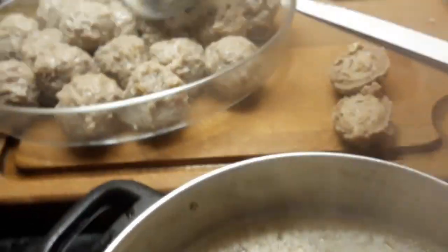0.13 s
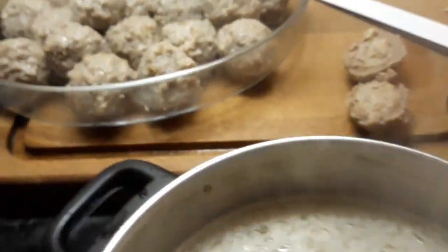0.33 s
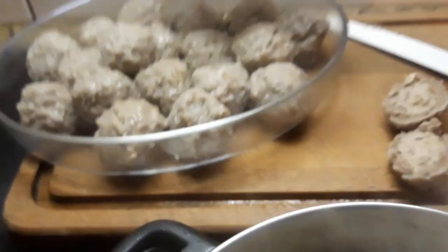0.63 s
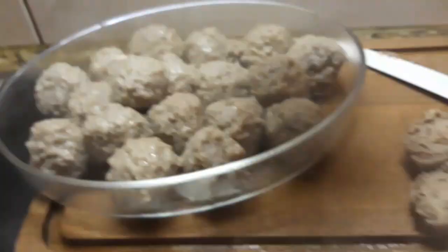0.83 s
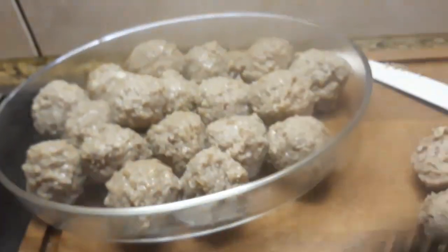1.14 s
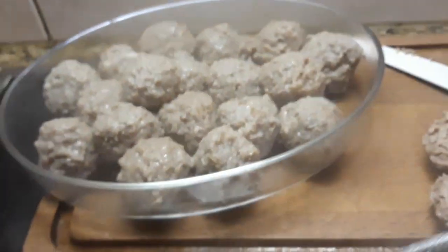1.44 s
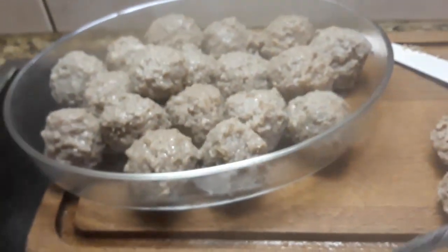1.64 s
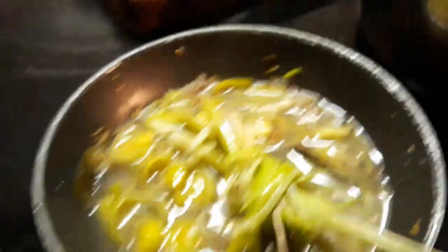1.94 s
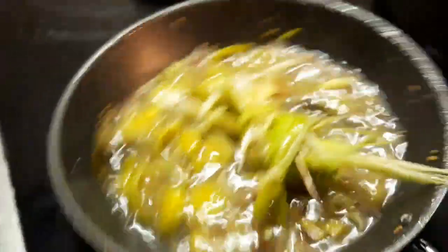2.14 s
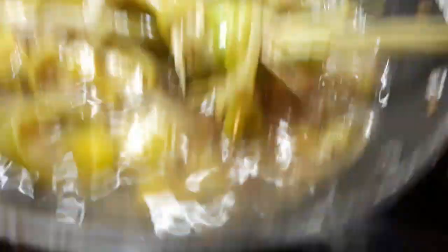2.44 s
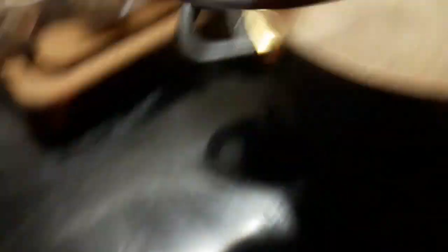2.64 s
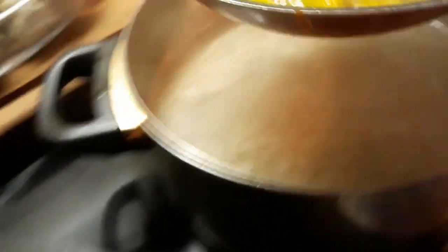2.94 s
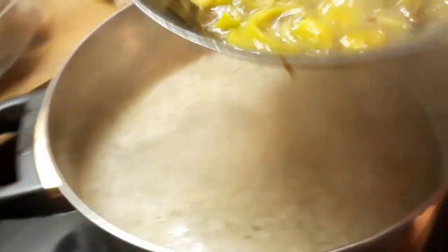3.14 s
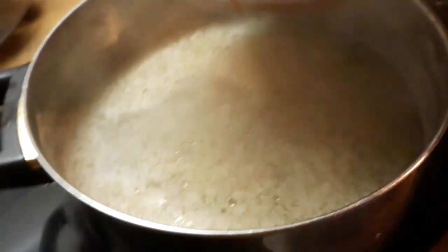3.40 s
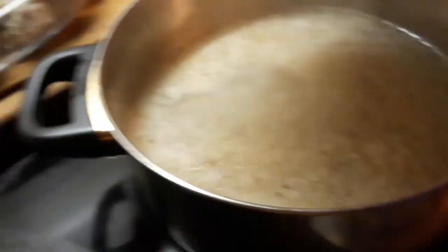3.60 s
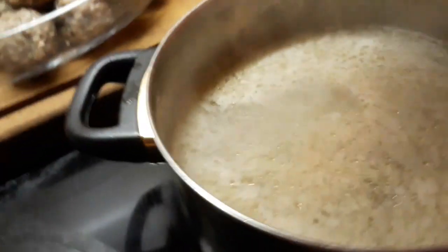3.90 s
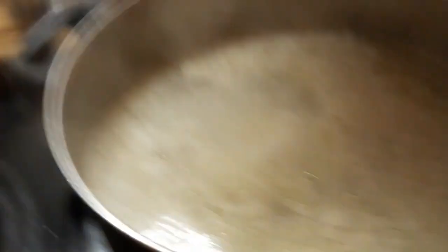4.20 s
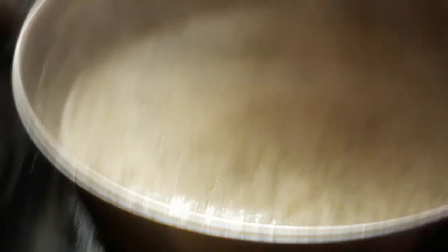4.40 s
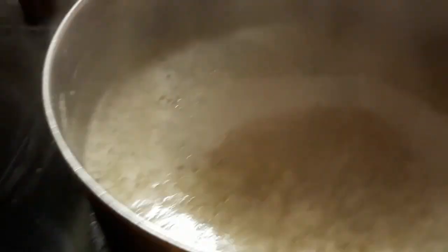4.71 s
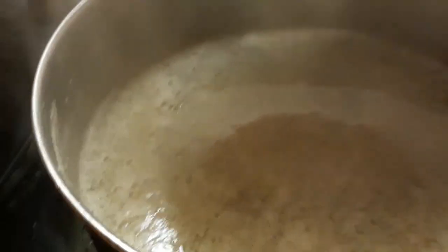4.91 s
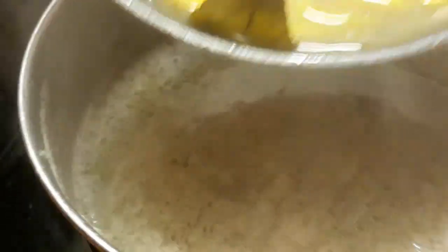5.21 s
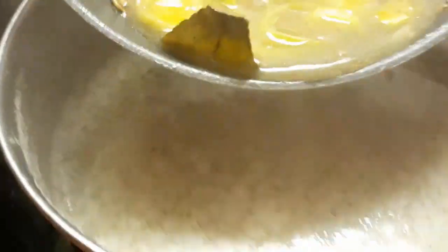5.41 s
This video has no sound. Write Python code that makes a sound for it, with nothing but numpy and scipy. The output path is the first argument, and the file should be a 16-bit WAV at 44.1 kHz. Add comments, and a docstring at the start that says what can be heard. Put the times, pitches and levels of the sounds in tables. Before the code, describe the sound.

Close metallic bang and scrape, quickening lid clinks, a pan thud and dull dish knocks, with quiet simmering behind.

```python
"""Pot and lid in a home kitchen

Close to a small microphone a metal pot is set down twice and dragged; its sound breaks off in a very short silence.
A metal lid rocks to rest with ever quicker clinks, a pan thuds, dishes knock dully and slide, and a hand
bumps the microphone, over faint simmering, room noise and mains hum. Struck things are noise cracks with decaying
sine modes, rubbed things are shaped noise under swelling strokes, and the simmer is noise with rising bubbles.
"""
import sys
import numpy as np
from scipy import signal
from scipy.io import wavfile
from scipy.ndimage import uniform_filter1d

SR = 44100
rng = np.random.default_rng(int(sys.argv[2]) if len(sys.argv) > 2 else 0)


def to_linear_factor(level_db):
    """Convert decibel levels (scalar or array-like) to linear amplitude factors."""
    exponent = np.asarray(level_db, float) / 20
    return 10 ** exponent


def store_wav(level_fs):
    """Save 16-bit WAV to argv[1]."""
    pcm = np.round(np.clip(np.atleast_2d(level_fs), -1, 1) * 32767)
    wavfile.write(sys.argv[1], SR, pcm.T.astype(np.int16))


N = 244755

# Colours give the spectrum's shape: their levels are relative, as are those of all modes and rings.
# room and simmer, with the pot's noisy tail swelling before the short silence:
# (time [s], murmur level [dB], hiss level [dB])
BACKGROUND_LEVELS = [(0, -51, -61.5), (.3, -66, -72), (.65, -65, -70.5), (.97, -69, -71.5), (1.4, -66, -69),
                     (1.86, -54.5, -41.5), (1.9, -59.5, -68.5), (2.25, -59, -59), (2.86, -54, -61.5),
                     (3.3, -55.5, -64), (3.76, -54.5, -63.5), (4.05, -54, -65.5), (4.7, -50.5, -59.5),
                     (4.9, -54, -67), (5.55, -53.5, -69.5)]
# colour of the low murmur: (frequency [Hz], level [dB])
MURMUR_COLOUR = [(18, -42), (30, -12), (69, -36.5), (98, 0.5), (177, -6), (379, 2), (431, -1), (579, -6.5),
                 (809, -7.5), (1090, -15), (1380, -29), (1760, -27.5), (2500, -31), (3250, -50),
                 (5500, -120)]
# colour of the hiss: (frequency [Hz], level [dB])
HISS_COLOUR = [(710, -29.5), (1200, 1.5), (1870, -1.5), (2550, -1.5), (2800, -4.5), (3100, -4.5),
               (3500, -2), (4080, 0.5), (5070, -3), (8170, -3.5), (9610, -11.5), (15200, -1.5), (16000, -5)]
HUM_HZ, HUM_DB = 49.4, -66
BUBBLES_PER_S, BUBBLE_DB = 14, -15.5  # level against the murmur
# the top of the hiss follows the hiss level only in part, around TOP_DB
TOP_HZ, TOP_DB, TOP_FOLLOWS = 9000, -70.5, 0.25
# narrow bands humming in the simmer: (start [s], end [s], centre [Hz], width [Hz], level [dB])
HUMMING_BANDS = [(0.27, 0.79, 418, 70, -68.5), (0.3, 1.57, 117, 55, -68.5), (2.299, 4.752, 281.7, 31, -58),
                 (2.7, 3.84, 403, 43, -60), (2.8, 4.402, 136, 8.2, -67.5), (3.699, 4.3, 2380, 230, -78),
                 (4.699, 5.65, 1380, 160, -68), (4.8, 5.65, 2440, 110, -82.5)]
# thin dry ticks: (time [s], level [dB], centre [Hz])
TICK_EVENTS = [(.106, -60, 7600), (0.197, -53.5, 7000), (1.1, -60.5, 7940), (2.128, -64, 11500),
               (2.845, -63, 12000), (2.965, -65, 11000), (3.187, -62, 14000), (3.483, -48, 8100),
               (3.52, -61, 13500), (3.853, -65, 11100), (4.66, -58, 9800)]

# faint rustling: (start [s], peak [s], end [s], level [dB], brightness [dB per octave])
RUSTLE_STROKES = [(0.0, 0.003, 0.17, -53.5, 0.5), (0.196, 0.2, 0.28, -59, 3.5),
                  (0.2, 0.245, 0.38, -53.5, -1.5), (1.07, 1.1, 1.17, -65, 7.5),
                  (1.21, 1.29, 1.36, -67, 1.5)]
# colour of the rustling: (frequency [Hz], level [dB])
RUSTLE_SPECTRUM = [(500, -5), (850, -30), (1010, 5), (1260, -7), (1750, -3.5), (2800, -15), (4700, -12.5),
                   (8500, -25), (9800, -40), (16000, -28)]
# the hand on the microphone: (start [s], peak [s], end [s], level [dB])
HANDLING_STROKES = [(0.0, 0.003, 0.07, -40.5), (0.04, 0.088, 0.2, -39.5), (2.835, 2.85, 2.89, -44.5),
                    (2.88, 2.915, 2.98, -53), (2.98, 3.016, 3.06, -47.5), (5.055, 5.078, 5.13, -45)]
# colour of the handling: (frequency [Hz], level [dB])
HANDLING_SPECTRUM = [(18, -40), (30, -26), (81, 7), (129, -0.5), (225, -35), (331, -3.5), (500, -13),
                     (650, -90), (1100, -120)]
# fingers knocking the microphone's housing: (time [s], level [dB])
HOUSING_KNOCKS = [(2.839, -37.5), (2.894, -41), (2.911, -36.5), (2.918, -44), (2.932, -40), (2.988, -43),
                  (5.073, -50)]
# colour of the housing: (frequency [Hz], level [dB])
HOUSING_COLOUR = [(30, -25), (70, 2), (130, 2), (190, 4), (300, -22), (600, -42), (1200, -66)]

# the pan lifted off the hob: (time [s], level [dB], treble tilt [dB per octave], ring level [dB])
PAN_THUDS = [(2.022, -38, -9.5, -1.5), (2.0345, -26, 5, -6.5)]
# modes of the pan: (frequency [Hz], level [dB], decay by 60 dB [s])
PAN_MODES = [(143, -25, 0.099), (213, -4.5, 0.1), (356, -1, 0.13), (470, -22, 0.087), (670, -5, 0.14),
             (1030, -10, 0.12)]
# colour of the pan's crack: (frequency [Hz], level [dB])
PAN_CRACK_COLOUR = [(60, -27), (150, 1.5), (382, 6), (543, -10.5), (1060, -10), (1560, -43), (2470, -42),
                    (5000, -56), (11000, -71)]
# room tail after the pan: (frequency [Hz], decay by 60 dB [s])
PAN_TAIL_DECAY = [(100, 0.089), (400, 0.65), (1200, 0.54), (4000, 0.73)]
# dull knocks of dishes: (time [s], level [dB], treble tilt [dB per octave], ring level [dB])
DISH_KNOCKS = [(3.667, -39, -14.5, -4), (4.059, -49, 3, -9), (4.075, -40.5, -3, -1),
               (4.1165, -30.5, -1, 9.5), (4.2375, -15.5, -2.5, -2), (4.2465, -25.5, 4, -8),
               (4.2615, -25.5, 3, -3), (4.274, -27, 6, 8), (4.287, -28, -2.5, 11), (4.31, -33.5, 5, 12)]
# modes of the dishes: (frequency [Hz], level [dB], decay by 60 dB [s])
DISH_MODES = [(283, -8, 0.34), (400, -17, 0.13), (455, 1, 0.063), (500, -5, 0.014), (548, 0.5, 0.084),
              (770, -20, 0.054), (1012, -2, 0.034), (1300, -7, 0.091), (1500, -20, 0.085),
              (1786, -7, 0.064), (2390, -24, .06), (3260, -37, 0.074)]
# colour of the dishes' crack: (frequency [Hz], level [dB])
DISH_CRACK_COLOUR = [(59, -66), (100, -42), (156, -28), (295, 5), (373, 1.5), (583, 10.5), (752, -1),
                     (1450, -5), (1900, -11), (2320, -19), (3400, -27), (4200, -54), (8460, -46),
                     (10200, -58), (16000, -52.5)]
# room tail after the dishes: (frequency [Hz], decay by 60 dB [s])
DISH_TAIL_DECAY = [(150, 0.52), (500, 0.29), (1500, 0.39), (4000, 0.15), (12000, 0.12)]
# dishes sliding: (start [s], peak [s], end [s], level [dB], brightness [dB per octave])
SLIDE_STROKES = [(3.54, 3.65, 3.78, -57.5, -1.5), (3.76, 3.85, 3.97, -62.5, 9),
                 (4.05, 4.12, 4.22, -59, 6.5), (4.24, 4.28, 4.45, -49.5, 0.5), (4.335, 4.37, 4.52, -51, 6),
                 (4.36, 4.6, 4.74, -44, 3)]
# colour of the sliding: (frequency [Hz], level [dB])
SLIDE_SPECTRUM = [(180, -36), (300, -12), (645, 1), (994, 4), (1750, -1.5), (2500, -2.5), (2850, -5.5),
                  (3700, -3.5), (8220, -12.5), (9880, -25.5), (16000, -19.5)]

# the lid touches down, then rocks from near edge to far edge: (time [s], level [dB], what lands [name])
LID_CLINKS = [(1.4227, -21.5, "flat"), (1.8721, -26.5, "near"), (2.068, -33.5, "near"),
              (2.2396, -28.5, "near"), (2.3935, -33, "near"), (2.4076, -30.5, "near"),
              (2.5382, -27.5, "near"), (2.664, -32.5, "far"), (2.787, -27, "near"), (2.8913, -35, "far"),
              (3.003, -30.5, "near"), (3.0917, -35.5, "far"), (3.1882, -33.5, "near"),
              (3.261, -38.5, "far"), (3.36, -37, "near"), (3.419, -39, "far"), (3.508, -38, "near"),
              (3.648, -40, "near"), (3.7077, -45, "far"), (3.778, -46, "near")]
# each landing, by name: (treble tilt [dB per octave], ring level [dB], time constant of the soft start [s])
LID_LANDINGS = {"flat": (0.52, -9, 0.00067), "near": (0.08, -5, 0.0071), "far": (-2.8, -5, 0.0061)}
# modes of the lid: (frequency [Hz], level [dB], decay by 60 dB [s])
LID_MODES = [(2524, -7, 0.072), (3354, -6.5, 0.068), (3620, -4, 0.081), (4400, -23, 0.089),
             (4900, 2.5, 0.047), (5816, -8.5, 0.14), (6830, -5, 0.063), (7070, 6.5, 0.053),
             (7110, -11, 0.25), (7190, -8.5, 0.22), (7360, -28, 0.1), (8600, -13, 0.28), (8700, -14, 0.092),
             (8540, -5, 0.04), (11920, -17, 0.068)]
# colour of the lid's crack: (frequency [Hz], level [dB])
LID_CRACK_COLOUR = [(410, -12.5), (700, -0.5), (1440, -2.5), (2550, -3.5), (3000, -7), (3460, 1.5),
                    (3990, -5), (4730, 4), (5400, -4), (7290, 0.5), (8880, -1), (9480, -25), (12200, -5),
                    (16000, -48.5)]
# room tail after the lid: (frequency [Hz], decay by 60 dB [s])
LID_TAIL_DECAY = [(1000, 0.46), (4000, 0.36), (9000, 0.2), (15000, 0.071)]
# the lid's rim scraping: (start [s], peak [s], end [s], level [dB], brightness [dB per octave])
SCRAPE_STROKES = [(1.44, 1.47, 1.61, -51, -1.5), (1.55, 1.615, 1.75, -43.5, 0),
                  (2.066, 2.08, 2.17, -52, -0.5), (2.105, 2.162, 2.198, -46.5, 0.5)]
# colour of the scraping: (frequency [Hz], level [dB])
SCRAPE_SPECTRUM = [(290, -38.5), (500, -22), (1340, -1.5), (2190, -3), (2810, -4.5), (3980, -3.5),
                   (6230, -9), (7420, -1.5), (10100, -16), (12900, -11.5), (16000, -14)]
# resonances of the scraped rim: (frequency [Hz], width [Hz], level [dB])
SCRAPE_RESONANCES = [(876, 50, 6), (1385, 55, -7), (3270, 170, -2), (4400, 266, 1.5), (5540, 180, 2),
                     (8000, 330, 1.5), (12970, 900, -3.5)]

# the pot dragged: (start [s], peak [s], end [s], level [dB], brightness [dB per octave])
DRAG_STROKES = [(1.67, 1.79, 1.84, -35, 0.5), (1.77, 1.845, 1.868, -30.5, 1)]
# colour of the drag: (frequency [Hz], level [dB])
DRAG_SPECTRUM = [(290, -67.5), (500, -25), (893, 2), (1060, -13), (1340, 2), (1530, -18), (1720, 0.5),
                 (2570, -10.5), (3340, -8), (8210, -17.5), (16000, -25)]
# resonances of the dragged pot: (frequency at the start of a stroke [Hz], width [Hz], level [dB])
DRAG_RESONANCES = [(876, 52, -3), (1150, 31, -1), (1347, 53, 0.5), (1700, 50, -6), (2190, 88, -5.5),
                   (2760, 90, 0), (3280, 100, 4), (3720, 42, 5), (4050, 80, 1.5), (5250, 70, 4),
                   (7550, 60, 4), (8380, 98, 0)]
# modes of the worktop: (frequency [Hz], level [dB], decay by 60 dB [s])
WORKTOP_MODES = [(72.2, -8, 0.14), (113.3, -4.5, 0.35), (143.7, -0.5, 0.47), (148, -9.5, 0.15),
                 (219.3, -5.5, 0.22)]
BOOM_LAG_S = 0.01063  # shifts the phases of the worktop's modes
# the pot set down on its edge, then flat:
# (time [s], level [dB], treble tilt [dB per octave], ring level [dB], worktop boom level [dB])
POT_LANDINGS = [(1.4249, -18.5, 5, 0, -28.5), (1.648, -0.5, 2, -3.5, -20)]
# modes of the pot: (frequency [Hz], level [dB], decay by 60 dB [s])
POT_MODES = [(372, -12, 0.52), (388, -12.5, 0.39), (614, -10, 0.1), (811, -12.5, .25), (820, -4.5, 0.15),
             (873, -7.5, 0.19), (987, -24.5, 0.4), (1365, -16.5, 0.22), (1536, -15, 0.22),
             (1660, -18, 0.16), (2394, -15.5, 0.1516), (2664, -13.5, 0.075), (3395, -11.5, .13),
             (3960, -28, 0.3), (5200, -25.5, 0.0805), (5460, -29, 0.2), (8210, -24, 0.078)]
# colour of the pot's crack: (frequency [Hz], level [dB])
POT_CRACK_COLOUR = [(120, -30), (200, -14.5), (265, -26), (380, 8), (700, -2.5), (1000, 3.5), (1500, -9.5),
                    (2560, -7.5), (3130, -10), (3840, -12.5), (5250, -15.5), (8030, -16.5), (10400, -38),
                    (15300, -33.5), (16500, -63)]
# room tail after the pot: (frequency [Hz], decay by 60 dB [s])
POT_TAIL_DECAY = [(80, 0.168), (300, 0.52), (1000, 0.58), (3000, 0.51), (8000, 0.26), (15000, 0.11)]
# the short silence: start [s], end [s]
SILENCE_S = (1.8675, 1.8735)

HARD_DB = -33  # around this level a blow keeps its top treble unchanged
MIC_LOW_HZ, MIC_TOP_HZ = 45, 15850


def evened(x):
    """Scales to an rms of 1."""
    return x / np.sqrt(np.mean(x ** 2) + 1e-20)


def read(points, hz):
    """Reads a table on a log-frequency axis."""
    f, value = np.transpose(points)
    return np.interp(np.log(hz + 1), np.log(f + 1), value)


def add(mix, s, sound):
    """Adds a sound at a time in seconds."""
    part = mix[round(s * SR):][:len(sound)]
    part += sound[:len(part)]


def noise(count, field_db, size=256):
    """Random short-time spectra shaped by a dB field over frequency (rows) and time (columns)."""
    frames = 4 * count // size + 5
    hz = np.fft.rfftfreq(size, 1 / SR)[:, None]
    t = np.arange(frames) * size / 4 / SR
    real, imaginary = rng.standard_normal((frames, len(hz), 2)).T
    spectra = (real + 1j * imaginary) * to_linear_factor(field_db(hz, t))
    return signal.istft(spectra, nperseg=size, noverlap=3 * size // 4)[1][:count]


def lumps(hz, at, bins, frames):
    """Random patches over frequency and time, rms 1, smoothed over some bins and frames."""
    grains = rng.standard_normal((len(at), len(hz))).T
    return evened(uniform_filter1d(uniform_filter1d(grains, bins, 0), frames, 1))


def octaves(hz, from_hz=2000):
    """Octaves above a frequency, levelling off in the top treble."""
    return np.log2((np.minimum(hz, 9000) + 50) / from_hz)


def impact(colour_db, count=1024):
    """The minimum-phase pulse of a colour: it starts at once and is as short as it can be, peak 1."""
    hz = np.abs(np.fft.fftfreq(4 * count, 1 / SR))
    log_gain = np.log(to_linear_factor(colour_db(hz)).clip(1e-5))
    pulse = np.fft.ifft(np.exp(np.conj(signal.hilbert(log_gain)))).real[:count]
    return pulse / np.abs(pulse).max()


def blows(rows, modes, crack, tail, ring_db, crack_t60, tail_db, treble_from_hz, soft_s, spot_db, swell_s,
          tick_db, impact_db, chatter_s, chatter_db, hold_s=0, waver_db=0, air_per_db=0):
    """Each blow is an impact, a tick, a crack, wavering modes, four rebounds and a tail dying band by band."""
    out, t = np.zeros(N), np.arange(SR // 2) / SR
    hz, db, t60 = np.transpose(modes)
    for s, level_db, treble_db, own_ring_db, *_ in rows:
        # with air_per_db set, softer blows lose top treble
        air_db = air_per_db * min(level_db - HARD_DB + rng.standard_normal(), 1)

        def tilt(f):
            return treble_db * octaves(f, treble_from_hz) + (f > 9500) * air_db

        def colour_db(f):
            return read(crack, f) + tilt(f)
        snap = noise(len(t), lambda f, at: colour_db(f), size=1024)
        decay = noise(len(t), lambda f, at: colour_db(f) - 60 * at / read(tail, f), size=512)

        where_db = spot_db * rng.standard_normal(len(hz))  # each spot struck favours other modes
        detune = 1 + 0.002 * rng.standard_normal(len(hz))  # the contact shifts each mode a little
        decay_db = db + tilt(hz) + where_db - 60 * t[:, None] / t60
        rings = to_linear_factor(decay_db) * np.sin(2 * np.pi * hz * detune * t[:, None])
        waver = evened(uniform_filter1d(rng.standard_normal((len(t) // 64 + 1, len(hz))), 9, 0))
        waver = uniform_filter1d(np.repeat(waver, 64, 0), 64, 0)[:len(t)]
        rings = (rings * to_linear_factor(waver_db * waver)).sum(1)
        rings *= 1 - np.exp(-t / swell_s)  # the ring builds up while the contact lasts
        rings *= to_linear_factor(ring_db + own_ring_db)

        soft = 1 - np.exp(-t / soft_s)
        crack_shape = to_linear_factor(-60 * (t - hold_s).clip(0) / crack_t60)
        tick_shape = to_linear_factor(tick_db - 60 * t / 0.0095)
        burst = snap * (crack_shape + tick_shape) / snap.std() / 3
        room_tail = to_linear_factor(tail_db) * decay / snap.std() / 3
        sound = (burst + room_tail + rings) * soft
        rebound = (burst + rings) * soft
        for late in rng.random(size=4):
            add(out, s + late * chatter_s, to_linear_factor(level_db + chatter_db - 8 * late) * rebound)
        add(sound, 0, to_linear_factor(impact_db) * impact(colour_db))
        add(out, s, to_linear_factor(level_db) * sound)
    return out


def rubbed(strokes, colour, rise_db, fall_db, bend, grit_db, patchy_db, rings=(), ring_db=0., glide=0.,
           slip_db=0., size=256):
    """Friction noise swells and dies with each stroke: gritty, patchy, ringing the body it rubs."""
    out = np.zeros(N)
    for start, peak, end, level_db, *bright in strokes:
        t = np.arange(start, end, 1 / SR)
        before = (peak - t).clip(0) / max(peak - start, 1 / SR)
        after = (t - peak).clip(0) / max(end - peak, 1 / SR)
        stroke_db = level_db - rise_db * before ** bend - fall_db * after ** bend

        def field_db(hz, at):
            peaks = 0
            for centre_hz, width, db in rings:
                moved_hz = centre_hz * (1 + glide * at / (end - start))
                peaks = peaks + to_linear_factor(ring_db + db) / np.sqrt(1 + (2 * (hz - moved_hz) / width) ** 2)
            body_db = 20 * np.log10(1 + peaks)
            return read(colour, hz) + sum(bright) * octaves(hz) + body_db + patchy_db * lumps(hz, at, 3, 12)
        grit = to_linear_factor(grit_db * evened(uniform_filter1d(rng.standard_normal(len(t)), 150)))
        slips = np.repeat(rng.exponential(size=len(t) // 24 + 1), 24)  # short slips of 24 samples
        grit = grit * to_linear_factor(slip_db * uniform_filter1d(slips, 12)[:len(t)].clip(0, 4))
        sound = evened(noise(len(t), field_db, size=size) * grit)
        sound = sound * signal.windows.tukey(len(t), 200 / len(t))
        add(out, start, sound * to_linear_factor(stroke_db))
    return out


def simmer():
    """A patchy low murmur with bubbles rising in pitch, a hiss that also carries the pot's noisy tail, and hum."""
    s, murmur_db, hiss_db = np.transpose(BACKGROUND_LEVELS)
    t, u = np.arange(N) / SR, np.arange(2200) / SR
    murmur = evened(noise(N, lambda hz, at: read(MURMUR_COLOUR, hz) + 2.5 * lumps(hz, at, 4, 6), size=2048))

    bubbles, kinds = np.zeros(N), np.geomspace(260, 900, 20)
    for hz in kinds:
        starts = rng.random(N) < BUBBLES_PER_S / len(kinds) / SR
        pops = starts * to_linear_factor(7.5 * rng.exponential(1, N).clip(0, 3))
        chirp = np.sin(2 * np.pi * hz * u * (1 + 5.4 * u))
        pop = chirp * np.exp(-u * hz / 3.7) * (1 - np.exp(-u * hz / 1.9))
        bubbles += signal.oaconvolve(pops, pop * to_linear_factor(read(MURMUR_COLOUR, hz)))[:N]
    low = (murmur + to_linear_factor(BUBBLE_DB) * evened(bubbles)) * to_linear_factor(np.interp(t, s, murmur_db))

    hiss = evened(noise(N, lambda hz, at: read(HISS_COLOUR, hz), size=1024))
    level_db = np.interp(t, s, hiss_db)
    top = signal.oaconvolve(hiss, signal.firwin(201, TOP_HZ, pass_zero=False, fs=SR), "same")
    top_level_db = TOP_DB + TOP_FOLLOWS * (level_db - TOP_DB)
    hiss = (hiss - top) * to_linear_factor(level_db) + top * to_linear_factor(top_level_db)
    return low + hiss + to_linear_factor(HUM_DB) * np.sin(2 * np.pi * HUM_HZ * t)


def humming():
    """Noise in narrow resonances of pot and water that swells and fades."""
    out = np.zeros(N)
    for start, end, centre_hz, width, level_db in HUMMING_BANDS:
        count = round((end - start) * SR)
        band = noise(count, lambda hz, at: -20 * np.log10(1 + (2 * (hz - centre_hz) / width) ** 2), size=4096)
        add(out, start, to_linear_factor(level_db) * evened(band) * signal.windows.tukey(count, 0.4))
    return out


def ticks():
    """Each tick is a short burst of treble noise, falling away within milliseconds."""
    out, t = np.zeros(N), np.arange(1024) / SR
    for s, level_db, centre_hz in TICK_EVENTS:
        burst = noise(len(t), lambda hz, at: -20 * np.log10(1 + ((hz - centre_hz) / 760) ** 2))
        add(out, s, to_linear_factor(level_db - 60 * t / 0.038) * evened(burst))
    return out


def rustles():
    """Faint rustling, made as friction noise without resonances."""
    return rubbed(RUSTLE_STROKES, RUSTLE_SPECTRUM, rise_db=13.0, fall_db=22.5, bend=1.58,
                  grit_db=-0.5, patchy_db=1.5)


def handling():
    """The hand moves on the microphone: low friction noise."""
    return rubbed(HANDLING_STROKES, HANDLING_SPECTRUM, rise_db=12.0, fall_db=20.5, bend=0.5,
                  grit_db=-1.0, patchy_db=2.5, size=1024)


def bumps():
    """Each finger knock on the housing is one low pulse."""
    out, pulse = np.zeros(N), impact(lambda hz: read(HOUSING_COLOUR, hz), count=2048)
    for s, level_db in HOUSING_KNOCKS:
        add(out, s, -to_linear_factor(level_db) * pulse)
    return out


def pan():
    """The pan leaves the hob with a low thud: a crack and a few low modes."""
    return blows(PAN_THUDS, PAN_MODES, PAN_CRACK_COLOUR, PAN_TAIL_DECAY, ring_db=-11.5, crack_t60=0.087,
                 tail_db=-1.5, treble_from_hz=690, soft_s=0.00055, spot_db=-2.0, swell_s=0.0026, tick_db=1.0,
                 impact_db=-1.0, chatter_s=0.0127, chatter_db=-5.5)


def dishes():
    """Dishes knock dully: soft contacts and mostly fast-dying modes."""
    return blows(DISH_KNOCKS, DISH_MODES, DISH_CRACK_COLOUR, DISH_TAIL_DECAY, ring_db=-23.0, crack_t60=0.041,
                 tail_db=1.0, treble_from_hz=730, soft_s=0.003, spot_db=3.0, swell_s=0.0044, tick_db=-20.0,
                 impact_db=1.0, chatter_s=0.03, chatter_db=-25.0, waver_db=6.5)


def slides():
    """Dishes slide: friction noise without resonances."""
    return rubbed(SLIDE_STROKES, SLIDE_SPECTRUM, rise_db=10.0, fall_db=23.5, bend=1.44,
                  grit_db=0.2, patchy_db=1.0)


def lid():
    """The lid clinks as it rocks; each kind of landing has its own colour, ring and softness."""
    out = np.zeros(N)
    for part, (treble_db, ring_db, soft_s) in LID_LANDINGS.items():
        rows = [(s, db, treble_db, ring_db) for s, db, lands in LID_CLINKS if lands == part]
        out += blows(rows, LID_MODES, LID_CRACK_COLOUR, LID_TAIL_DECAY, ring_db=-11.5, crack_t60=0.025,
                     tail_db=-9.0, treble_from_hz=5300, soft_s=soft_s, spot_db=3.0, swell_s=0.0013,
                     tick_db=-7.5, impact_db=-29.0, chatter_s=0.018, chatter_db=-6.0, hold_s=0.0034,
                     waver_db=3.5, air_per_db=1.5)
    return out


def scrape():
    """The lid's rim scrapes: friction noise through broad resonances."""
    return rubbed(SCRAPE_STROKES, SCRAPE_SPECTRUM, rise_db=21.5, fall_db=27.5, bend=2.6, grit_db=2.1,
                  patchy_db=1.0, rings=SCRAPE_RESONANCES, ring_db=12.5, size=512)


def drag():
    """The dragged pot slips in short steps and rings in narrow resonances that glide up."""
    return rubbed(DRAG_STROKES, DRAG_SPECTRUM, rise_db=14.5, fall_db=8.0, bend=0.61, grit_db=1.2,
                  patchy_db=3.0, rings=DRAG_RESONANCES, ring_db=13.0, glide=0.04, slip_db=2.0, size=1024)


def worktop():
    """The worktop booms under the pot; its low modes beat, and their level wavers slowly at random."""
    out, t = np.zeros(N), np.arange(SR // 2) / SR
    boom = np.zeros(len(t))
    for hz, db, t60 in WORKTOP_MODES:
        boom += to_linear_factor(db - 60 * t / t60) * np.sin(2 * np.pi * hz * (t - BOOM_LAG_S))
    boom *= 1 - np.exp(-t / 0.00041)
    for s, *_, boom_db in POT_LANDINGS:
        waver_db = 3.5 * evened(uniform_filter1d(rng.standard_normal(len(t)), 900))
        waver_db *= np.minimum(t / 0.071, 1)  # wavering sets in gradually
        add(out, s, to_linear_factor(boom_db + waver_db) * boom)
    return out


def pot():
    """The pot is set down: a hard, bright crack sets off its metal modes."""
    return blows(POT_LANDINGS, POT_MODES, POT_CRACK_COLOUR, POT_TAIL_DECAY, ring_db=-15.0, crack_t60=0.054,
                 tail_db=-15.0, treble_from_hz=1400, soft_s=0.00077, spot_db=-4.0, swell_s=0.00012,
                 tick_db=0.5, impact_db=-1.5, chatter_s=0.022, chatter_db=-31.0, waver_db=4.0)


def scene():
    """Sums the kitchen; all falls silent for a moment, and the pot and worktop do not ring on after it."""
    t = np.arange(N) / SR
    silence_from, silence_to = SILENCE_S
    room = simmer() + ticks()
    pot_ring = pot()
    knocks = dishes() + pan()
    friction = drag() + scrape() + slides() + rustles()
    microphone = handling() + bumps()
    set_down = (pot_ring + worktop()) * (t < silence_to)
    mix = room + knocks + friction + microphone + set_down + lid() + humming()
    away = np.maximum(silence_from - t, t - silence_to)  # seconds from the short silence
    return (mix * np.clip(away / 0.0002, 0, 1))[None]


def top_cut(x):
    """Nothing passes above the cut-off."""
    return signal.sosfilt(signal.butter(12, 16840, fs=SR, output="sos"), x)


def record(dry):
    """The microphone drops the deep bass and most of the top treble, and rounds the loudest peaks."""
    bass_filter = signal.butter(3, MIC_LOW_HZ, "high", fs=SR, output="sos")
    low_cut = signal.sosfilt(bass_filter, dry)
    dull = signal.oaconvolve(low_cut, signal.firwin(301, MIC_TOP_HZ, fs=SR)[None], "same")
    picked_up = dull + to_linear_factor(-25.5) * (low_cut - dull)
    rounded = 0.95 * np.tanh(picked_up / 0.95)
    return top_cut(rounded)


dry = scene()
out = record(dry)
store_wav(out)
```